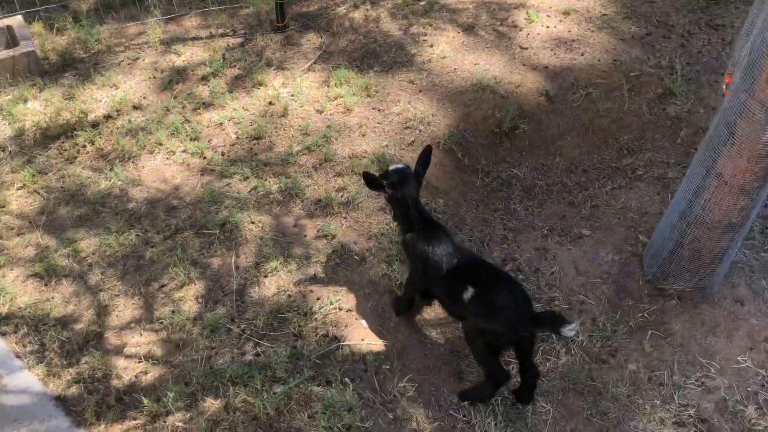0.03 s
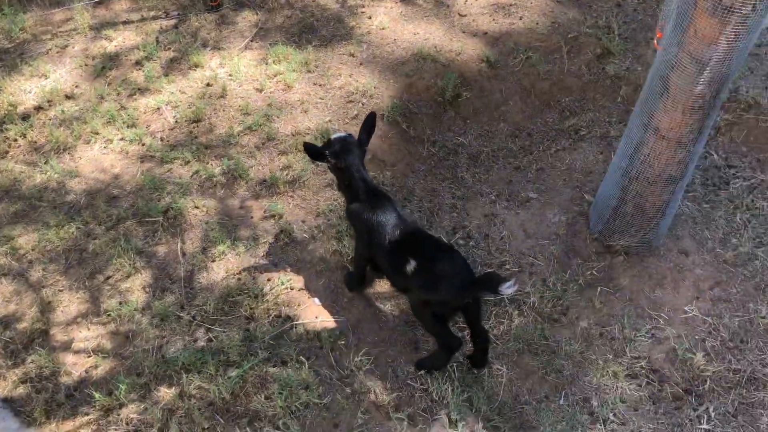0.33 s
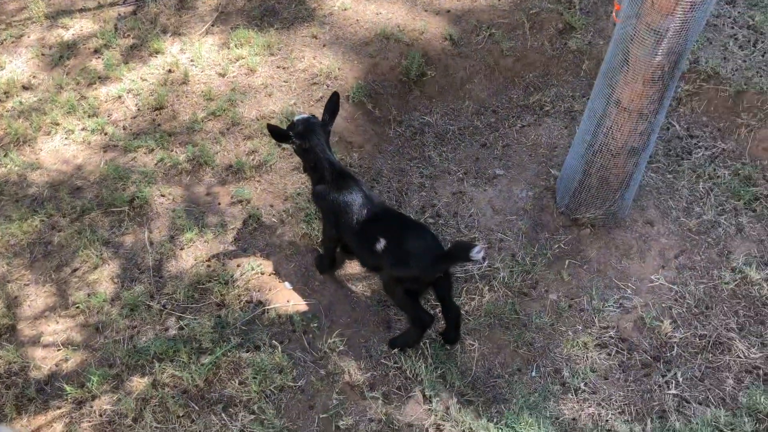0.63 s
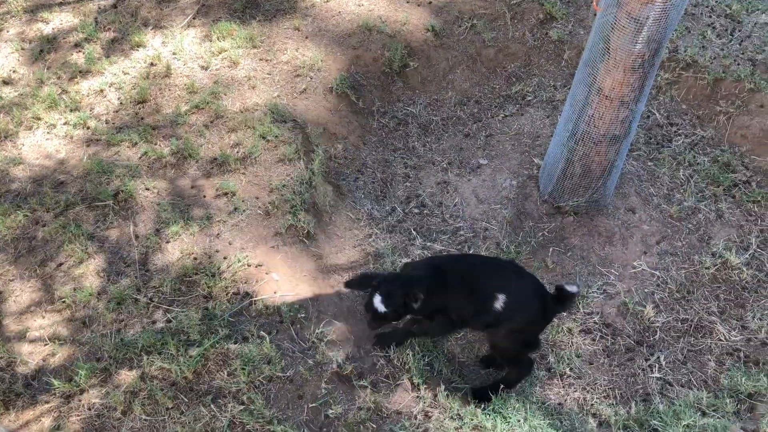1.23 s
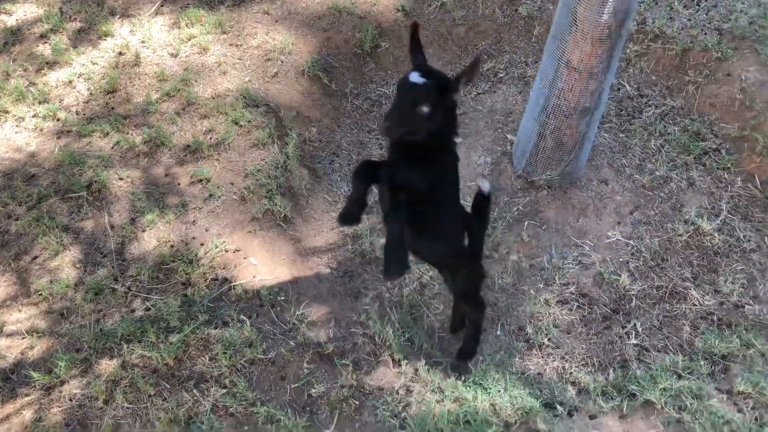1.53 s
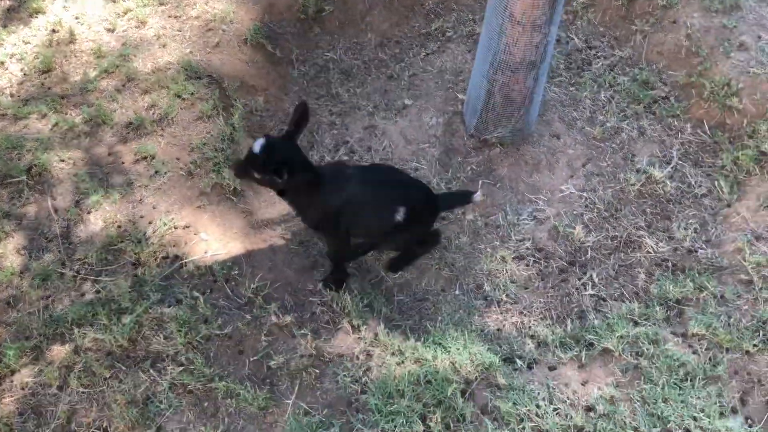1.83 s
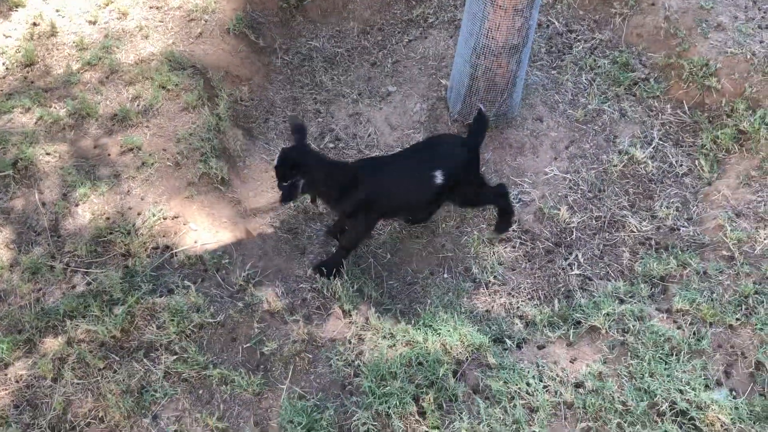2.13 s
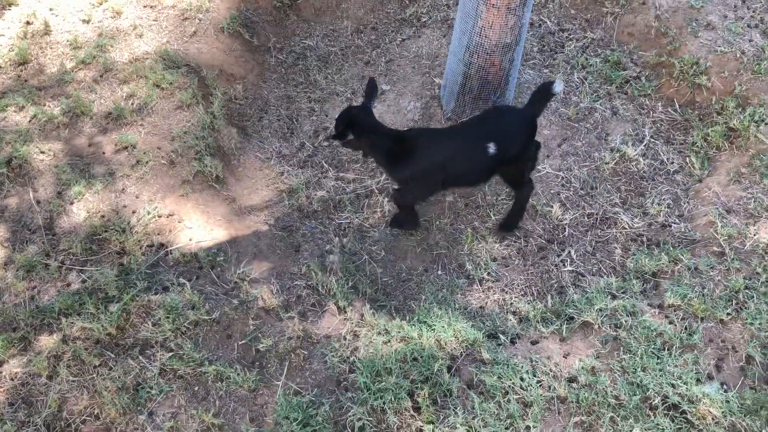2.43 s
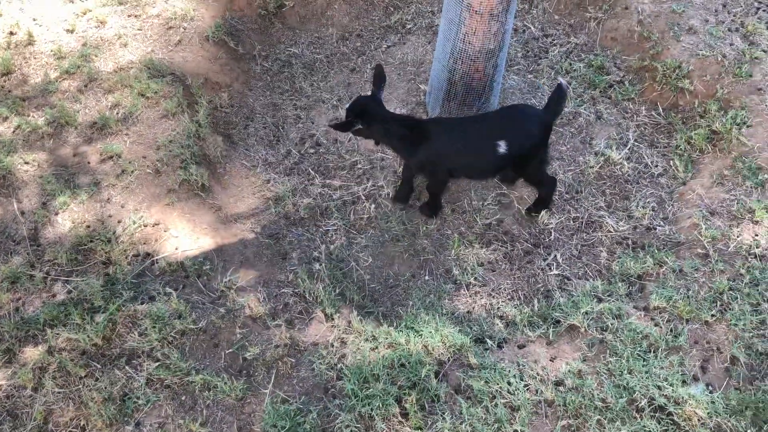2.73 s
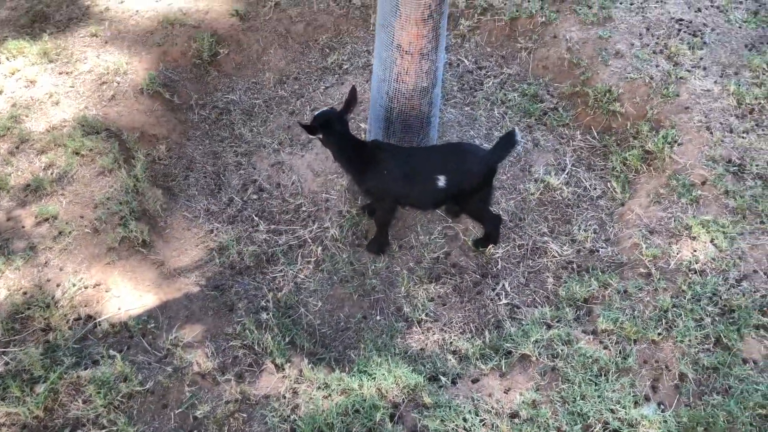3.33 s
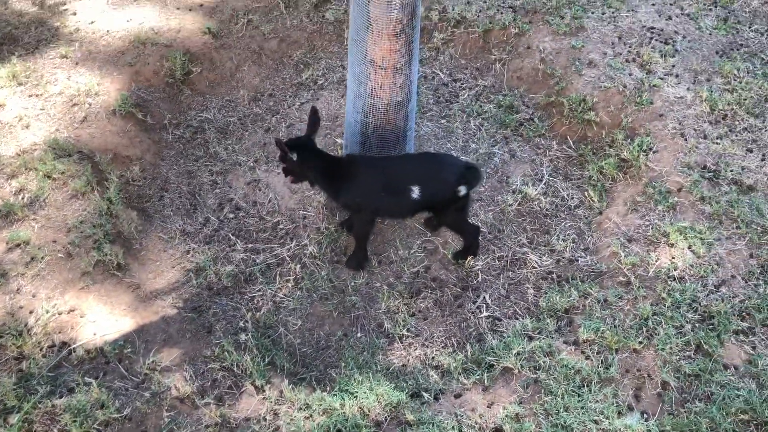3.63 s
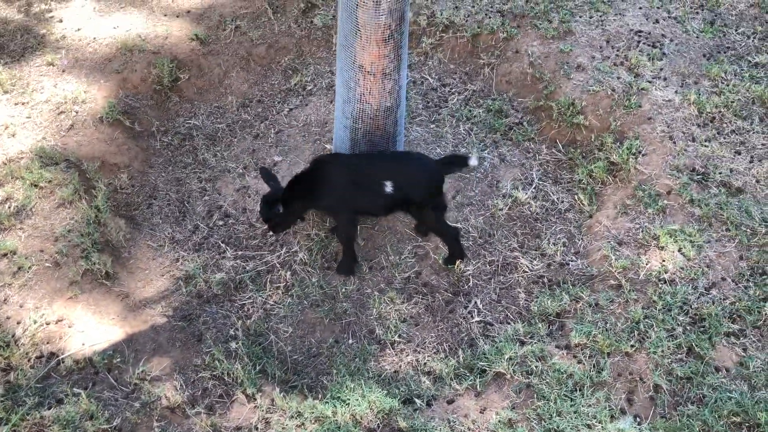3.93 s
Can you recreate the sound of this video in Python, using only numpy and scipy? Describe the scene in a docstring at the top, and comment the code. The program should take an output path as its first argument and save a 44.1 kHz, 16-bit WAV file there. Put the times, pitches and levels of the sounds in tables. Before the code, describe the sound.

A young goat close to the microphone gives one squeaky bleat, scuffs softly through dry grass, then bleats twice more in quick stutters. Insects buzz steadily over a faint rumble in an outdoor yard.

```python
"""A dirt yard, one microphone near a kid goat. A distant motor hums under the outdoor rumble, crickets
trill and a cicada buzzes. The kid opens with one arched squeak and a croak, thrown back by the walls.
From 1.2 s to 2 s it hops and scuffs the dry grass; a cricket swells, then a faint far tone passes.
At 2.8 s and 3.6 s it bleats, three squeaks each time: glottal pulses ringing its throat and mouth.
The high buzz and hiss fade out at the end, dulling the treble, and the hooves scuff once more."""
import sys
import numpy as np
from scipy import signal
from scipy.fft import rfft, irfft, next_fast_len
from scipy.io import wavfile
from scipy.ndimage import uniform_filter1d, map_coordinates

SR = 44100
rng = np.random.default_rng(int(sys.argv[2]) if len(sys.argv) > 2 else 0)


def file_out(sig):
    """Save sig as 16-bit WAV at sys.argv[1]."""
    # one column per channel
    cols = np.atleast_2d(sig).T
    # limit, then scale
    lim = np.clip(cols, -1, 1)
    pcm = np.round(lim * 32767).astype(np.int16)
    wavfile.write(sys.argv[1], SR, pcm)


N = 176400
TOP_HZ = 15750  # the microphone's band limit


def amp(db):
    """Decibels to gain."""
    return 10 ** (np.asarray(db) / 20)


def unit(x):
    """Scale to rms 1."""
    return x / np.sqrt(np.mean(x ** 2) + 1e-20)


def along(points, hz):
    """Read (f/Hz, value) points at hz, on a log frequency axis."""
    f, values = np.transpose(points)
    return np.interp(np.log(hz + 1), np.log(f + 1), values)


def clock():
    """The time of each sample in seconds."""
    return np.arange(N) / SR


def curve(rows):
    """(t/s, value) points joined by lines."""
    return np.interp(clock(), *np.transpose(rows))


def wobble(rate):
    """A smooth random curve, rate knots a second."""
    return map_coordinates(rng.standard_normal(int(N * rate / SR) + 4), [clock() * rate])


def noise(spectrum):
    """Noise of rms 1, coloured by (f/Hz, level/dB) points."""
    gain = amp(along(spectrum, np.fft.rfftfreq(N, 1 / SR)))
    return unit(irfft(rfft(rng.standard_normal(N)) * gain, N))


def resonate(x, gain, size=4096):
    """x through the minimum-phase filter with this gain over frequency."""
    cepstrum = irfft(np.log(np.maximum(gain(np.fft.rfftfreq(size, 1 / SR)), 1e-6)))
    cepstrum[1:size // 2] *= 2
    cepstrum[size // 2 + 1:] = 0
    return signal.fftconvolve(x, irfft(np.exp(rfft(cepstrum))))[:len(x)]


def echoes(x, paths):
    """Reflections of x, one for each (delay/s, level/dB) path."""
    return sum(amp(db) * np.pad(x, (int(s * SR), 0))[:N] for s, db in paths)


def outdoors(motor_hz=75.16, tone_hz=399, waver_db=2.5, drift_rad=0.51):
    """Far off: a motor's wavering hum, a faint passing tone and the broad rumble of the open air."""
    motor_orders = [(1, -53.5), (2, -65), (3, -65.5)]  # harmonics of the hum: multiple, level/dB
    tone_level = [(0, -70), (2.45, -67.5), (2.6, -56.5), (2.85, -57), (3.05, -71), (4, -81)]  # swell of the tone: t/s, level/dB
    air_spectrum = [(20, -48), (35, -37), (47, -3.5), (58, 6.5), (75, 9.5), (95, -1), (120, 1.5), (170, -2),
                    (230, -1), (300, -5.5), (400, -2), (460, -3), (520, 0.5), (700, -10), (850, -7.5),
                    (1000, -10), (1500, -10.5), (1950, -12.5), (2400, -18), (3400, -23), (5000, -33.5),
                    (10000, -18), (15800, -48)]  # colour of the rumble: f/Hz, level/dB
    air_level = [(0, -46.5), (2, -47.5), (3.8, -48), (3.9, -48.5), (4, -49)]  # course of the rumble: t/s, level/dB
    phase = 2 * np.pi * motor_hz * clock()
    hum = sum(amp(db) * unit(amp(waver_db * wobble(10)) * np.sin(k * phase + drift_rad * wobble(9)))
              for k, db in motor_orders)
    tone = unit(np.sin(2 * np.pi * tone_hz * clock() + drift_rad * wobble(12)))
    rumble = amp(curve(air_level) + 0.12 * wobble(5.66)) * noise(air_spectrum)
    return hum + amp(curve(tone_level)) * tone + rumble


def trill(hz, pulse_hz, depth=0.31, waver_hz=13):
    """A cricket's pure note, one pulse per stroke of the wings."""
    strokes = 1 + depth * np.cos(2 * np.pi * pulse_hz * clock() + 0.26 * wobble(5.2))
    note = np.sin(2 * np.pi * np.cumsum(hz + waver_hz * wobble(60)) / SR)
    return unit(strokes * note * amp(1.1 * wobble(25.1)))


def crickets():
    """Around the yard one cricket swells midway, a second keeps on, and others blur in the distance."""
    swell = [(0, -65), (1.72, -73), (1.88, -59), (2.4, -59), (2.85, -59.5), (3.2, -69.5), (4, -63.5)]  # the first cricket: t/s, level/dB
    chorus = [(3300, -49), (3750, -7), (3950, -0.5), (4090, 5), (4230, -12.5), (4400, -5), (4800, -38)]  # band of the far crickets: f/Hz, level/dB
    first = amp(curve(swell)) * trill(hz=4176, pulse_hz=58)
    second = amp(-65) * trill(hz=4073, pulse_hz=53.1)
    return first + second + amp(-63.5) * noise(chorus)


def cicada(scatter_s=.000012, scatter_db=1.1, drift=.002, treble_fade_start_s=3.787, fade_db_per_s=61):
    """Tymbal ribs buckle in quick clicks that ring the body, over a diffuse buzz from the trees."""
    click_rate = [(0, 151.7), (1.6, 151.5), (2.6, 150.7), (4, 150.7)]  # pace of the tymbal: t/s, rate/Hz
    ribs = [(0, -3), (.0008, -1), (.0013, -5.5)]  # buckles within one click: delay/s, level/dB
    trunks = [(.0021, -21.5), (.0037, -21.5), (.0094, -13.5), (0.0174, -14)]  # reflections off trunks and ground: delay/s, level/dB
    body = [(3000, -50), (5400, -22), (6100, -22.5), (6650, -7.5), (6950, -13.5), (7400, -17.5),
            (7700, -11), (8300, -5), (8550, -8.5), (8850, -2), (9020, -1.5), (9200, 1.5), (9380, -3),
            (9650, -8), (10700, -12.5), (11050, -15.5), (11450, -10.5), (12000, -22), (13500, -28),
            (15800, -34)]  # body resonances: f/Hz, level/dB
    hiss = [(3000, -30), (8000, 0), (12000, -2), (15800, -9)]  # diffuse top of the buzz: f/Hz, level/dB
    song_level = [(0.1, -46.5), (0.14, -49.5), (0.19, -47), (0.58, -47), (0.65, -49), (1.64, -48),
                  (2.56, -50), (3.48, -48.5), (3.6, -50)]  # overall gain ahead of the treble fade: t/s, level/dB
    cycles = np.cumsum(curve(click_rate) * (1 + drift * wobble(8))) / SR
    starts = np.interp(np.arange(1, int(cycles[-1])), cycles, clock())
    clicks = np.zeros(N)
    for delay, db in ribs:
        timing, strength = rng.standard_normal((len(starts), 2)).T
        at = np.clip((starts + delay + scatter_s * timing) * SR, 0, N - 1).astype(int)
        clicks += np.bincount(at, amp(db + scatter_db * strength), N)
    near = unit(resonate(clicks + echoes(clicks, trunks), lambda f: amp(along(body, f))))
    buzz = amp(-2) * near + amp(-2.5) * noise(body) + amp(-14) * noise(hiss)
    treble_fade_db = fade_db_per_s * np.maximum(clock() - treble_fade_start_s, 0)
    return amp(curve(song_level) - treble_fade_db) * buzz


def hooves(grain_db=4, thud_hz=75, thud_s=0.011):
    """At ground level hooves crunch the dry grass, and the landings thud on the soil."""
    scuffs = [(1.2, -53.5, 0.024, 1), (1.297, -51.5, 0.032, -3), (1.337, -56, .03, 8),
              (1.455, -57, .02, 10), (1.805, -53, .008, 7), (1.94, -58, .02, 8), (1.985, -47, 0.0077, 2),
              (2.012, -51, .012, 3), (3.937, -48, 0.0036, 1), (3.953, -56, 0.0039, 5)]  # hooves in grass: t/s, level/dB, length/s, treble lift/dB at half TOP_HZ
    grass = [(100, -10), (500, 8), (1500, -9), (4000, -1.5), (8000, -11), (15000, -12)]  # colour of the crunch: f/Hz, level/dB
    landings = [(1.302, -43), (1.484, -48), (1.974, -44)]  # hooves on soil: t/s, level/dB
    t, out = clock(), np.zeros(N)
    for s, db, length, lift_db in scuffs:
        crunch = noise([(hz, level + lift_db * hz / (TOP_HZ / 2)) for hz, level in grass])
        grainy = unit(crunch * amp(grain_db * wobble(900)))
        rise = np.maximum(t - s + length / 2, 0) / (length / 2)
        out += amp(db) * rise * np.exp(1 - rise) * grainy
    for s, db in landings:
        age = np.maximum(t - s, 0)
        envelope = age / thud_s * np.exp(1 - age / thud_s)
        out += amp(db) * envelope * np.sin(2 * np.pi * thud_hz * age)
    return out


def yard(direct, tail_db=-19, build_s=0.022):
    """The direct sound reaches the microphone, then slaps from nearby walls and a thin, short tail."""
    walls = [(0.018, -20), (.027, -22.5), (.036, -25.5), (.055, -35)]  # wall reflections: delay/s, level/dB
    wall_colour = [(500, 6), (1900, 2.5), (4300, -0.5), (7000, -1.5), (15000, -9)]  # filter on those reflections: f/Hz, gain/dB
    decay = [(300, 0.2), (2000, 0.19), (6000, 0.25), (12000, 0.089)]  # reverberation of the yard: f/Hz, T60/s
    hz, t, bands = signal.stft(rng.standard_normal(SR // 2), SR, nperseg=256)
    tail = signal.istft(bands * amp(-60 * t / along(decay, hz)[:, None]), SR, nperseg=256)[1]
    tail *= 1 - np.exp(-np.arange(len(tail)) / SR / build_s)
    slaps = resonate(echoes(direct, walls), lambda f: amp(along(wall_colour, f)))
    return direct + slaps + amp(tail_db) * signal.fftconvolve(direct, tail / np.linalg.norm(tail))[:N]


def voice(pitch, effort, throat, dip_hz, jitter, rasp_db, harmonics=24):
    """Glottal pulses with a little air ring the throat and opening mouth; the nose cuts one dip."""
    widths = [204, 243, 303, 313, 380]  # the five throat resonances: width/Hz
    tilt = [(300, -32), (620, -2.5), (1100, 1.5), (7500, 1.5), (9000, 3), (11000, 0), (15000, -17)]  # overall colour of the voice: f/Hz, gain/dB
    valley_db, nasal_db, nasal_width_hz = -21.5, -11, 300
    mouth_shift, mouth_s = 0.054, 0.0097  # resonances rise by this share as it opens; time constant

    def gain(f):
        """The response of throat and nose with the mouth open."""
        peaks = sum(amp(db) ** 2 / (1 + ((f - hz) / width) ** 2) ** 1.7
                    for (hz, db), width in zip(throat, widths))
        dip_db = nasal_db * np.exp(-((f - dip_hz) / nasal_width_hz) ** 2)
        return np.sqrt(peaks + amp(valley_db) ** 2) * amp(along(tilt, f) + dip_db)

    shake = unit(uniform_filter1d(rng.standard_normal(len(pitch)), size=90))
    phase = 2 * np.pi * np.cumsum(pitch * (1 + jitter * shake)) / SR
    pulses = unit(np.cos(np.arange(1, harmonics + 1)[:, None] * phase).sum(0))
    breath = unit(rng.standard_normal(len(pitch)) * (1 + np.cos(phase)))
    source = pulses + amp(rasp_db) * breath
    from_peak = (np.arange(len(pitch)) - np.argmax(effort)) / SR
    opening = .5 + .5 * np.tanh(from_peak / mouth_s + 1)
    narrow = resonate(source, lambda f: gain(f * (1 + mouth_shift)))
    sound = (1 - opening) * narrow + opening * resonate(source, gain)
    return sound * effort / np.sqrt(np.average(sound ** 2, weights=effort ** 2))


def goat(clean_rasp_db=-28, closing_rasp_db=20, croak_s=.012, croak_hz=522, fall_oct_per_s=9):
    """The kid, close by: each syllable swells clean and shuts roughly; a falling croak ends each bleat."""
    syllables = [(.032, -26.5, .023, 0.018, 3680), (2.845, -43.5, 0.026, 0.019, 3140),
                 (2.939, -40.5, 0.016, 0.015, 3050), (3.039, -31, 0.018, .014, 2090),
                 (3.643, -34, 0.022, 0.017, 3440), (3.728, -27, 0.018, 0.015, 2500),
                 (3.826, -23, 0.021, 0.014, 2500)]  # squeaks: peak t/s, level/dB, swell/s, release/s, nasal dip f/Hz
    throats = [
        [(1730, 4), (3050, -8), (4280, -0.5), (5480, -5), (6750, -6)],
        [(1130, -3), (2250, -6.5), (5000, -7.5), (5650, -8), (6800, -13)],
        [(1250, 0.5), (2400, -4), (4700, -8), (6100, -5.5), (7200, -9)],
        [(1270, -5.5), (2760, -1.5), (4250, 2.5), (5350, 3.5), (6650, -5.5)],
        [(1250, -4), (2450, -8), (3900, -3), (4950, -0.5), (6130, -2)],
        [(1610, 2), (3600, -1.5), (5000, 3.5), (6400, 1), (7050, -4.5)],
        [(1870, 6), (3470, -5), (5100, -2.5), (5620, 0.5), (7250, -5.5)],
    ]  # five throat and mouth resonances per syllable: f/Hz, level/dB
    bend_times = [-.04, -.026, -.015, -.002, .007, .016, .034]  # moments around a syllable's peak: t/s
    bends = [
        [520, 566, 599, 614, 606, 582, 540],
        [440, 484, 528, 570, 586, 590, 540],
        [560, 615, 626, 606, 592, 574, 530],
        [570, 636, 630, 625, 620, 604, 540],
        [520, 566, 582, 610, 620, 618, 570],
        [590, 646, 644, 646, 649, 648, 570],
        [590, 670, 623, 633, 614, 588, 540],
    ]  # each syllable's pitch at those moments: f/Hz
    croaks = [(.087, -44), (3.11, -50), (3.885, -47)]  # hoarse last flutters: t/s, level/dB
    croak_throat = [(1750, 2), (3400, -1.5), (4300, 1), (5050, -5.5), (7200, -4)]  # resonances during a croak: f/Hz, level/dB
    t, out = clock(), np.zeros(N)
    for (s, db, swell, release, dip_hz), bend, throat in zip(syllables, bends, throats):
        span = np.abs(t - s) < .07
        from_peak = t[span] - s
        pitch = uniform_filter1d(np.interp(from_peak, bend_times, bend), size=220)
        effort = np.exp(-np.where(from_peak < 0, (from_peak / swell) ** 2,
                                  np.abs(from_peak / release) ** 2.5))
        rasp_db = clean_rasp_db + closing_rasp_db * np.clip(from_peak / release, 0, 1.5)
        out[span] += amp(db) * voice(pitch, effort, throat, dip_hz, jitter=.01, rasp_db=rasp_db)
    for s, db in croaks:
        span = np.abs(t - s) < .05
        from_peak = t[span] - s
        pitch = croak_hz * 2 ** (-fall_oct_per_s * from_peak)
        effort = np.exp(-(from_peak / croak_s) ** 2)
        out[span] += amp(db) * voice(pitch, effort, croak_throat, dip_hz=2600, jitter=.025, rasp_db=-5)
    return out


def scene():
    """The goat in its yard with the insects behind it, in mono."""
    return (yard(goat()) + hooves() + cicada() + crickets() + outdoors())[None]


def record(dry):
    """The microphone keeps nothing above its band limit."""
    size = next_fast_len(N + SR // 2)
    passband = np.fft.rfftfreq(size, 1 / SR) < TOP_HZ
    return irfft(rfft(dry, size) * passband, size)[..., :N]


dry = scene()
out = record(dry)
file_out(out)
```